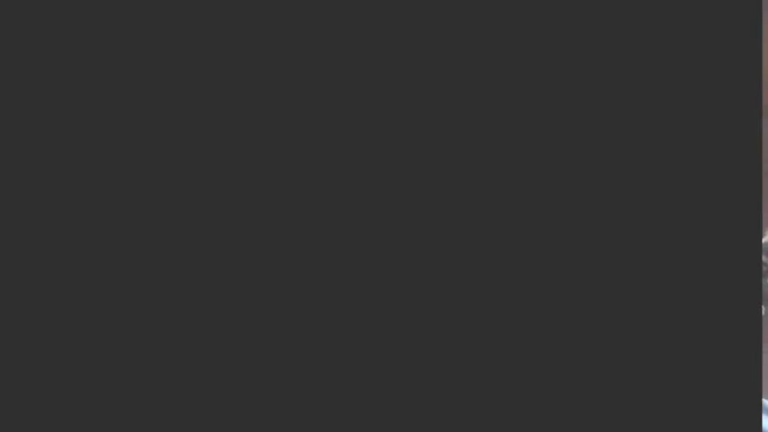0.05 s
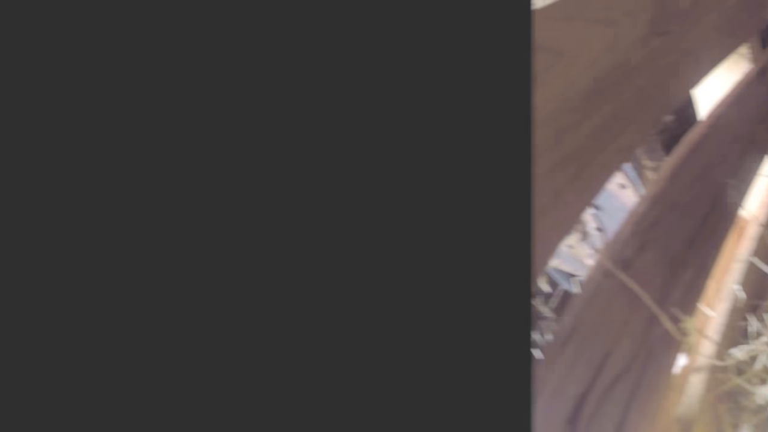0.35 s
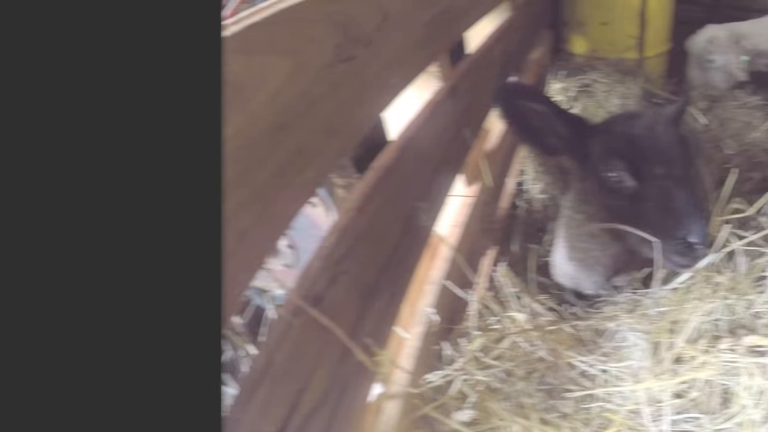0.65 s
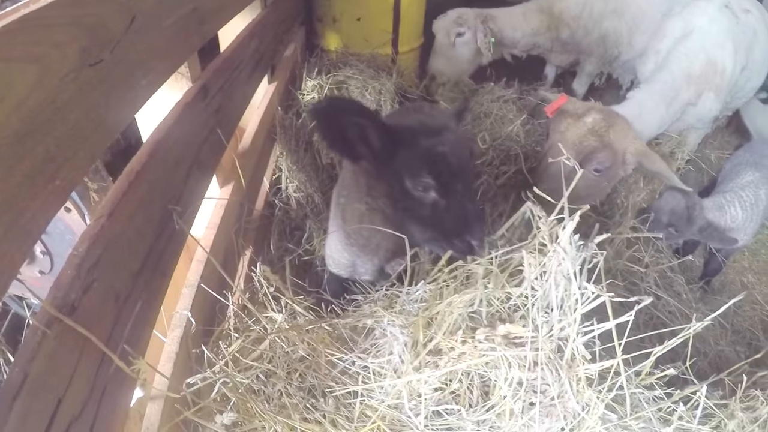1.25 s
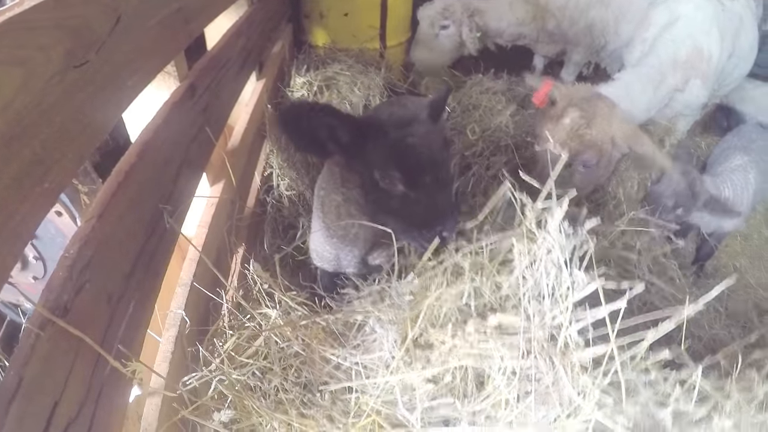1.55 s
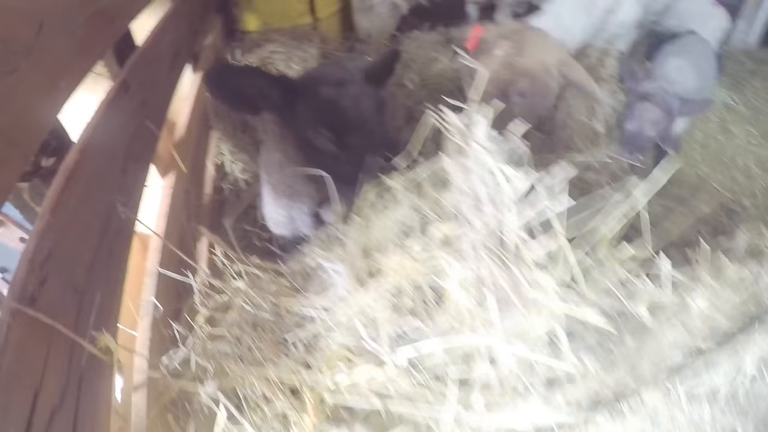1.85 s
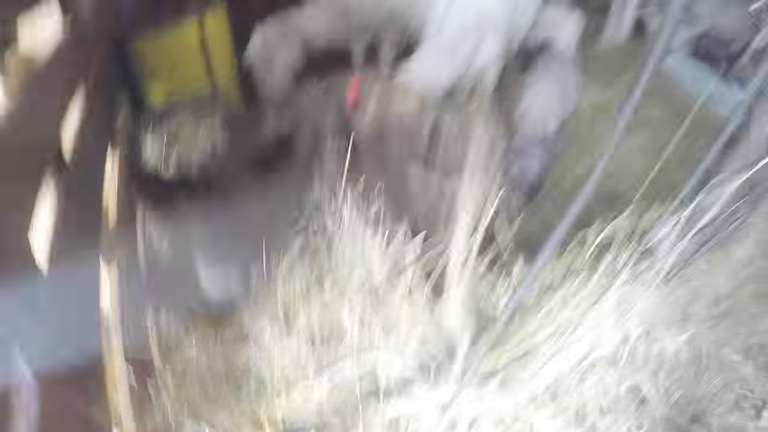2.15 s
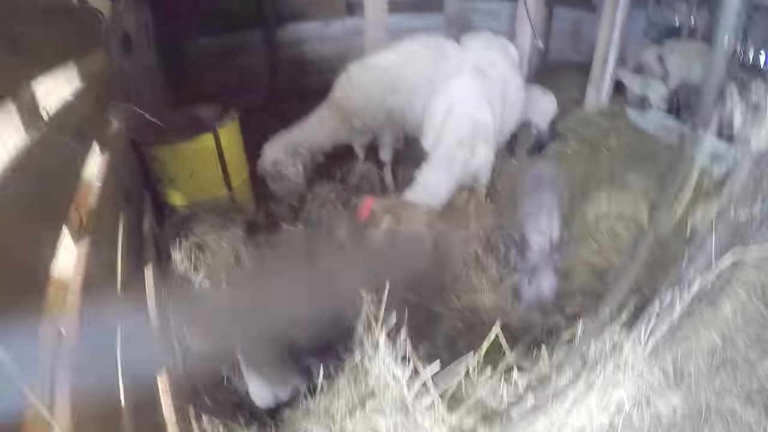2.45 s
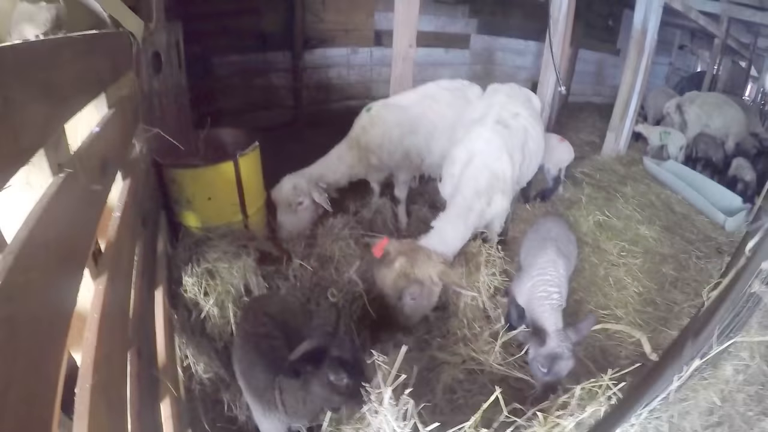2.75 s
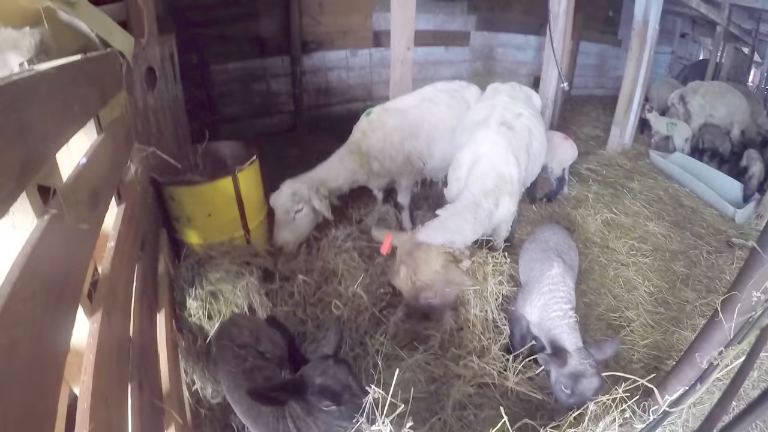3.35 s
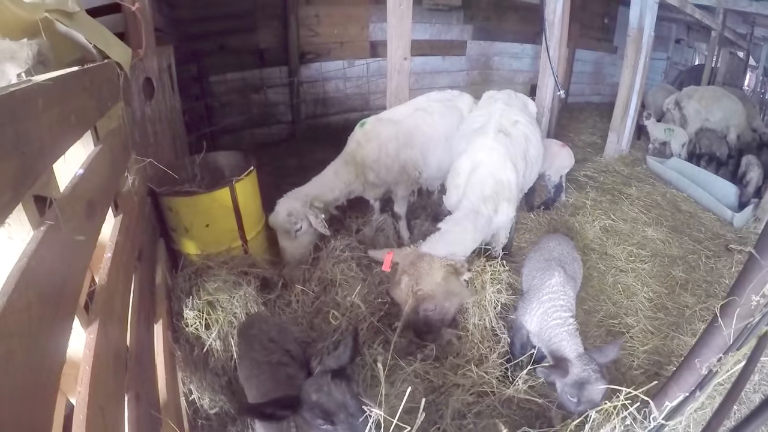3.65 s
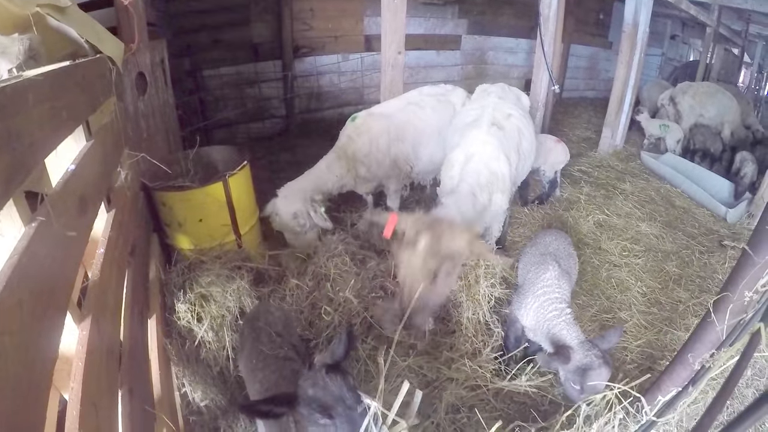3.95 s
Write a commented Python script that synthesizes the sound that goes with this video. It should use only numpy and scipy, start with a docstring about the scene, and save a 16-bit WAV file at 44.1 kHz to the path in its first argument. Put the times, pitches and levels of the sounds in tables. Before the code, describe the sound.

One wavering lamb bleat, rough at its start and end, sounds close by in a wooden pen. It follows low rumble, soft thumps on the moving microphone and a single straw snap; the rumble and faint hiss continue afterward.

```python
"""Lamb bleating in a barn pen.

One long quavering bleat, hoarse at both ends and clearer in the middle, with a short echo off the boards.
Vocal-fold pulses and puffs of air ring low throat, piercing muzzle and treble nose resonances.
A hand-held camera rumbles and takes small knocks; one straw snaps. Faint hiss and hay ticks fade in."""
import sys
import numpy as np
from scipy import signal
from scipy.fft import rfft, irfft
from scipy.io import wavfile
from scipy.ndimage import uniform_filter1d

SR = 44100
rng = np.random.default_rng(int(sys.argv[2]) if len(sys.argv) > 2 else 0)


def master_out(mix):
    """Clip the mix to full scale and print it as 16-bit PCM to the path in sys.argv[1]."""
    frames = np.transpose(np.atleast_2d(mix))
    ceiling = np.clip(frames, -1, 1)
    pcm = np.round(ceiling * 32767).astype(np.int16)
    wavfile.write(sys.argv[1], SR, pcm)


N = 176400

# vocal folds (time [s], pitch [Hz], roughness [clipped to 0-1])
VOICE = [(2.42, 317.9, 1.13), (2.515, 308.6, 0.88), (2.54, 307.2, 0.31), (2.578, 312, 0),
         (2.615, 341.7, 0.53), (2.632, 336.8, 0.27), (2.65, 324.8, 0.87), (2.685, 349.6, 0.36),
         (2.712, 348, 0.16), (2.738, 338, 0.48), (2.77, 346.3, 0.22), (2.792, 347, 0.77),
         (2.816, 336.7, 0.32), (2.86, 353.5, 0.43), (2.905, 348.9, 0), (2.945, 349, 0.2),
         (2.97, 345.3, 0.1), (3.0, 344.8, 0.3), (3.03, 339, 0.11), (3.075, 348.2, 0.02),
         (3.11, 343.5, 0.14), (3.135, 337, 0.25), (3.208, 342.5, 0.05), (3.23, 321, 0.3),
         (3.255, 324.3, 0.25), (3.284, 322.4, 0.2), (3.3, 315.7, 0.47), (3.33, 311.6, 0.22),
         (3.37, 307.1, 0.34), (3.392, 286.2, 0.92), (3.425, 307.4, 0.1), (3.45, 308, 0.54),
         (3.5, 299.8, 0.77)]
JITTER, SHIMMER_DB, RASP_DB = .018, 2, -3  # at full roughness
PUFF_DECAY_CYCLES = 0.17


def vocal_folds():
    """One pulse and one puff of air per cycle; roughness unsettles the pulses and raises the puffs."""
    pitch_hz = curve(VOICE)
    roughness = np.clip(curve(VOICE, column=2), 0, 1)
    cycle = (np.cumsum(pitch_hz) / SR).astype(int)
    detune, strength = rng.standard_normal((N // 50, 2))[cycle].T  # one draw per cycle
    turns = np.cumsum(pitch_hz * (1 + JITTER * roughness * detune)) / SR
    pulses = unit(sum(np.cos(2 * np.pi * k * turns) for k in range(1, 44)))
    puffs = unit(np.exp(-(turns % 1) / PUFF_DECAY_CYCLES) * rng.standard_normal(N))
    return pulses * undb(SHIMMER_DB * roughness * strength) + undb(RASP_DB) * roughness ** 2 * puffs


# vocal tract resonances before shifting, low to high (frequency [Hz], gain [dB])
THROAT = [(250, -42), (590, -39.5), (700, -27.5), (1030, -19.5), (1360, 1.5), (1720, -18.5), (2070, -19),
          (2500, -27.5), (3200, -82)]
MUZZLE = [(1700, -70), (2100, -19.5), (2420, -21), (2760, -19), (3100, -4.5), (3420, 3), (3790, -2),
          (4140, -3), (4450, -28), (5200, -73)]
NOSE = [(3700, -52.5), (4200, -9), (4480, 6), (4850, -4.5), (5200, -6), (5800, -17), (6500, -12.5),
        (7300, -27.5), (8000, -33.5), (14000, -44)]
WHISTLE = [(7500, -58), (8400, -21), (8900, -27), (9400, -30), (10600, -46)]
# resonance shift by mouth shape (time [s], throat [ratio], muzzle and nose [ratio])
MOUTH = [(2.42, 1, 1.02), (2.55, 0.85, 1.04), (2.6, 0.81, 1.07), (2.68, 0.94, 0.97), (2.82, 0.94, 1.01),
         (2.95, 0.96, 1.012), (3.15, 1.0, 0.99), (3.27, 1.0, 0.97), (3.36, 0.96, 0.95), (3.45, 0.96, 0.93)]
# envelopes before trim (time [s], level [dB])
THROAT_LEVEL = [(2.48, -59), (2.514, -58), (2.674, -47), (2.698, -51.5), (2.748, -41), (2.772, -49),
                (2.898, -41), (2.954, -44), (2.97, -57), (3.002, -39.5), (3.028, -52.5), (3.048, -43),
                (3.122, -44.5), (3.138, -38.5), (3.256, -43), (3.274, -59.5), (3.312, -42), (3.414, -50),
                (3.43, -41.5), (3.54, -67)]
MUZZLE_LEVEL = [(2.39, -62), (2.398, -73), (2.446, -52.5), (2.466, -62), (2.51, -58.5), (2.534, -39.5),
                (2.558, -41.5), (2.572, -52.5), (2.63, -39), (2.848, -34.5), (2.856, -39), (2.886, -33),
                (2.898, -37.5), (2.912, -33), (2.946, -36), (2.956, -31.5), (2.982, -37.5), (3.036, -35),
                (3.052, -37.5), (3.366, -35), (3.392, -49), (3.44, -33), (3.522, -66.5), (3.54, -61)]
TREBLE_LEVEL = [(2.39, -81), (2.418, -70), (2.502, -67), (2.558, -52), (2.578, -65), (2.68, -46),
                (2.7, -50), (2.732, -47), (3.02, -47.5), (3.03, -50.5), (3.254, -48), (3.35, -50),
                (3.388, -58), (3.474, -53), (3.526, -71), (3.54, -73)]
THROAT_TRIM_DB, MUZZLE_TRIM_DB, TREBLE_TRIM_DB = -1, 0.5, -0.5
WHISTLE_UNSHIFTED_S, WHISTLE_OCT_PER_S, WHISTLE_MAX_OCT = 2.93, .9, .33


def lamb():
    """The folds ring three groups of resonances that shift with the mouth; a thin whistle climbs on top."""
    source = vocal_folds()
    low_drive = pen(source, echo_db=-8)
    high_drive = pen(source, echo_db=-3)
    throat_shift, upper_shift = curve(MOUTH), curve(MOUTH, column=2)
    climb_oct = np.minimum(WHISTLE_OCT_PER_S * (clock() - WHISTLE_UNSHIFTED_S), WHISTLE_MAX_OCT)
    throat = follow(sweep(low_drive, THROAT, throat_shift), THROAT_LEVEL)
    muzzle = follow(sweep(high_drive, MUZZLE, upper_shift), MUZZLE_LEVEL)
    nose = sweep(high_drive, NOSE, upper_shift)
    whistle = sweep(high_drive, WHISTLE, 2 ** climb_oct)
    treble = follow(nose + whistle, TREBLE_LEVEL)
    return undb(THROAT_TRIM_DB) * throat + undb(MUZZLE_TRIM_DB) * muzzle + undb(TREBLE_TRIM_DB) * treble


def pen(x, echo_db, t60_s=0.23, delay_s=.003):
    """Nearby boards add a short echo, damped by hay."""
    t = clock()[:SR // 2]
    echo = rng.standard_normal(len(t)) * undb(-60 * t / t60_s) * (t > delay_s)
    echo /= np.sqrt(np.sum(echo ** 2))
    return x + undb(echo_db) * signal.fftconvolve(x, echo)[:N]


# knocks on the camera (time [s], thud gain [dB], tap gain [dB])
KNOCKS = [(0.517, -49.5, -85), (0.607, -45, -68), (0.706, -43.5, -75), (0.726, -40.5, -42.5),
          (0.849, -40, -49), (1.244, -45, -72), (1.281, -35, -38), (1.619, -44, -45), (1.649, -41.5, -51),
          (1.667, -41, -46), (2.013, -47, -46), (2.06, -52, -48), (2.179, -45, -53), (2.275, -43.5, -50),
          (2.305, -46, -44), (2.375, -48.5, -43), (2.531, -42, -54.5), (2.688, -47, -79), (2.85, -39, -63),
          (2.925, -43, -47), (3.813, -43.5, -69)]
# camera body modes (frequency [Hz], gain [dB], t60 [s])
BODY_MODES = [(121, 0, 0.1), (149.5, 7.5, 0.13), (181, 0.5, 0.15), (321, -25.5, 0.14)]
# dull contact (frequency [Hz], relative gain [dB])
TAP_SPECTRUM = [(150, -1.5), (300, 7), (550, -0.5), (880, -3), (1100, -23), (2000, -40), (6000, -70)]


def knocks(thud_rise_s=0.0065, scrape_t60_s=0.083, scrape_gain=.04):
    """Each knock: a dull tap, a short scrape, then the low thud of the camera body."""
    t, thuds, contacts = clock(), 0, 0
    scrape_noise = scrape_gain * rng.standard_normal(N)
    for start, thud_db, tap_db in KNOCKS:
        age = np.maximum(t - start, 0)
        thuds += undb(thud_db) * ring(BODY_MODES, age) * (1 - np.exp(-age / thud_rise_s))
        blow = signal.unit_impulse(N, int(start * SR))
        scrape = scrape_noise * (age > 0) * undb(-60 * age / scrape_t60_s)
        contacts += undb(tap_db) * (blow + scrape)
    tap_peak = colour(signal.unit_impulse(N), TAP_SPECTRUM).max()
    return thuds + colour(contacts, TAP_SPECTRUM) / tap_peak


# handling noise (frequency [Hz], relative density [dB])
RUMBLE_SPECTRUM = [(8, -18), (16, 9.5), (27, -1.5), (38, 0), (52, -10.5), (75, -12.5), (110, -21.5),
                   (155, -19), (200, -27), (260, -33.5), (450, -42), (1000, -60)]
# handling envelope (time [s], level [dB])
RUMBLE_LEVEL = [(0, -99.5), (.2, -67), (.5, -49.5), (.8, -42), (1.4, -41.5), (1.8, -38), (2.3, -38.5),
                (2.6, -37.5), (2.95, -37), (3.15, -40.5), (3.5, -48), (4, -37)]


def rumble(waver_db=1.5):
    """Low handling noise swells as the camera moves."""
    noise = unit(colour(rng.standard_normal(N), RUMBLE_SPECTRUM))
    return noise * undb(curve(RUMBLE_LEVEL) + waver_db * drift(rate_hz=18))


# cracks within one snap (time [s], gain [dB])
CRACKS = [(1.9972, -37), (1.9978, -30), (1.9995, -47), (2.0005, -47)]
# stalk modes (frequency [Hz], gain [dB], t60 [s])
STRAW_MODES = [(3770, -9, 0.011), (5240, 1.5, 0.0041), (7100, -23.5, 0.009), (13500, -19, 0.0015)]


def straw(ticks_per_s=21, rustle_db=-84.5):
    """One stalk snaps close by; hay ticks faintly under feeding sheep."""
    t = clock()
    snap = sum(undb(db) * ring(STRAW_MODES, np.maximum(t - start, 0)) for start, db in CRACKS)
    ticks = (rng.random(N) < ticks_per_s / SR) * rng.standard_normal(N)
    rustle = signal.fftconvolve(ticks, ring(STRAW_MODES, t[:SR // 20]))[:N]
    return snap + undb(rustle_db) * unit(rustle)


# barn hiss (frequency [Hz], relative density [dB])
AIR_SPECTRUM = [(180, -47), (300, -7.5), (559, -2.5), (606, -1.5), (801, -3), (991, -0.5), (1080, 0.5),
                (1570, -4.5), (2140, -2.5), (2970, -5), (3440, -3.5), (4470, -6.5), (15000, -22.5)]
# steady air resonances (centre [Hz], width [Hz], level [dB])
DRONES = [(596, 4, -79), (1080, 68, -76), (1209, 36, -77), (3340, 80, -77.5)]


def barn_air(hiss_db=-64):
    """Faint hiss with a few narrow, steady bands of noise."""
    air = undb(hiss_db) * unit(colour(rng.standard_normal(N), AIR_SPECTRUM))
    for hz, width_hz, db in DRONES:
        band = 1 / (1 + (2 * (bins_hz() - hz) / width_hz) ** 2)
        air += undb(db) * unit(irfft(rfft(rng.standard_normal(N)) * band, N))
    return air


def undb(db):
    """Decibels to gain."""
    return 10 ** (np.asarray(db) / 20)


def unit(x):
    """Scale to rms 1."""
    return x / np.sqrt(np.mean(x ** 2) + 1e-18)


def clock():
    """Sample times [s]."""
    return np.arange(N) / SR


def bins_hz():
    """FFT bin frequencies."""
    return np.arange(N // 2 + 1) * SR / N


def curve(rows, column=1):
    """One table column, linearly interpolated in time."""
    rows = np.array(rows)
    return np.interp(clock(), rows[:, 0], rows[:, column])


def gain_at(spectrum, hz):
    """Linear gain of a spectrum, interpolated in log frequency."""
    spectrum = np.array(spectrum)
    return undb(np.interp(np.log(hz + 1e-9), np.log(spectrum[:, 0]), spectrum[:, 1]))


def minimum_phase(gains):
    """Give gains (frequency on axis 0) the phase of a body that rings after a blow."""
    cepstrum = irfft(np.log(gains), axis=0)
    half = len(cepstrum) // 2
    cepstrum[1:half] *= 2
    cepstrum[half + 1:] = 0
    return np.exp(rfft(cepstrum, axis=0))


def colour(x, spectrum):
    """Filter by a static spectrum."""
    return irfft(rfft(x) * minimum_phase(gain_at(spectrum, bins_hz())), N)


def sweep(x, spectrum, shift):
    """Filter by a spectrum whose frequencies are scaled by a moving ratio."""
    hz, t, frames = signal.stft(x, SR, nperseg=512, noverlap=384)
    gains = gain_at(spectrum, hz[:, None] / np.interp(t, clock(), shift))
    return signal.istft(frames * minimum_phase(gains), SR, nperseg=512, noverlap=384)[1][:N]


def follow(x, levels, ramp_s=0.013):
    """Hold the running rms to a level curve; silent outside it."""
    t = clock()
    rms = np.sqrt(uniform_filter1d(x ** 2, size=900) + 1e-12)
    gate = np.clip(np.minimum(t - levels[0][0], levels[-1][0] - t) / ramp_s, 0, 1)
    return x / rms * gate * undb(curve(levels))


def drift(rate_hz):
    """Smooth random motion, rms 1."""
    return unit(irfft(rfft(rng.standard_normal(N)) * np.exp(-(bins_hz() / rate_hz) ** 2), N))


def ring(modes, age_s):
    """Decaying modes after a blow."""
    return sum(undb(db - 60 * age_s / t60) * np.sin(2 * np.pi * hz * age_s) for hz, db, t60 in modes)


def scene():
    """Bleat and handling noise, mono; air and straw fade in."""
    fade_s = 0.83
    fade = np.minimum(clock() / fade_s, 1) ** 2.19
    return (lamb() + knocks() + rumble() + fade * (barn_air() + straw()))[None]


def record(dry):
    """Steep low-pass of the camera."""
    cutoff_hz = 15300
    return signal.sosfilt(signal.ellip(10, .2, 60, cutoff_hz, fs=SR, output="sos"), dry)


dry = scene()
out = record(dry)
master_out(out)
```